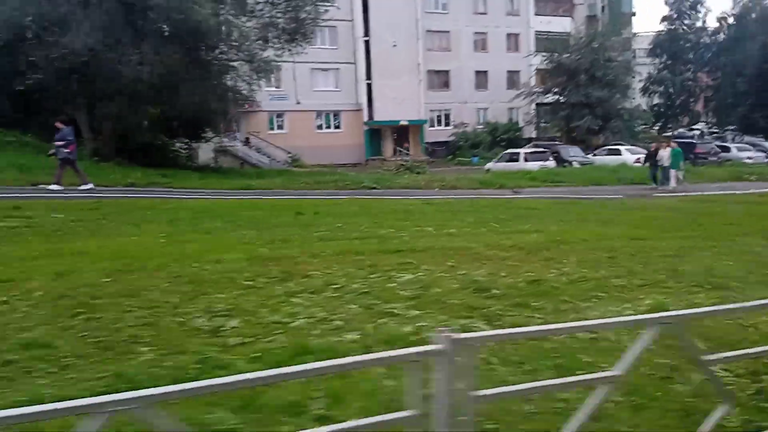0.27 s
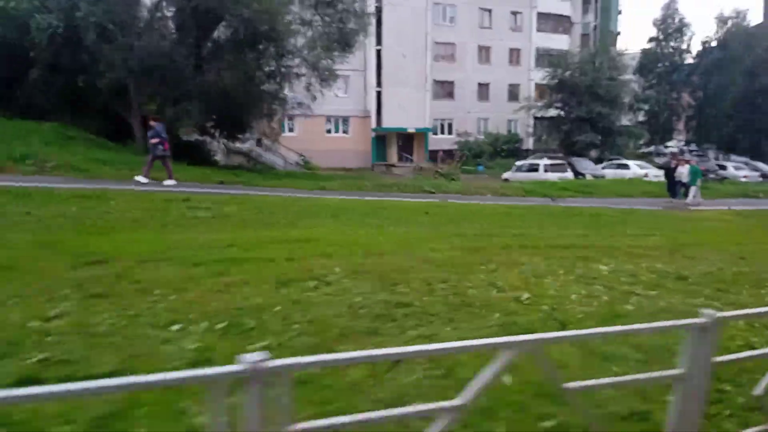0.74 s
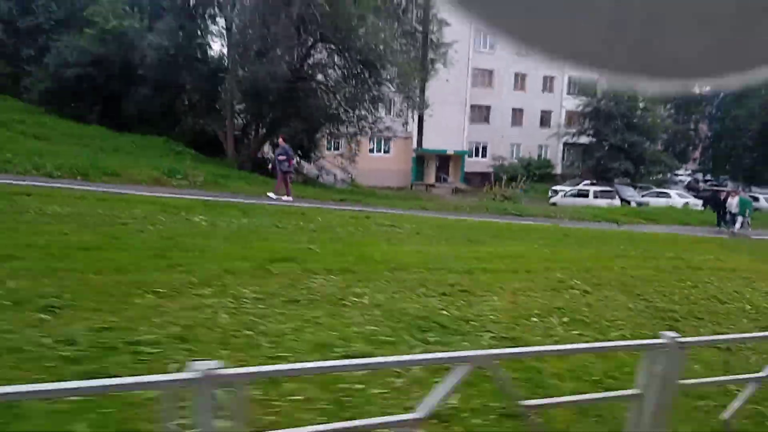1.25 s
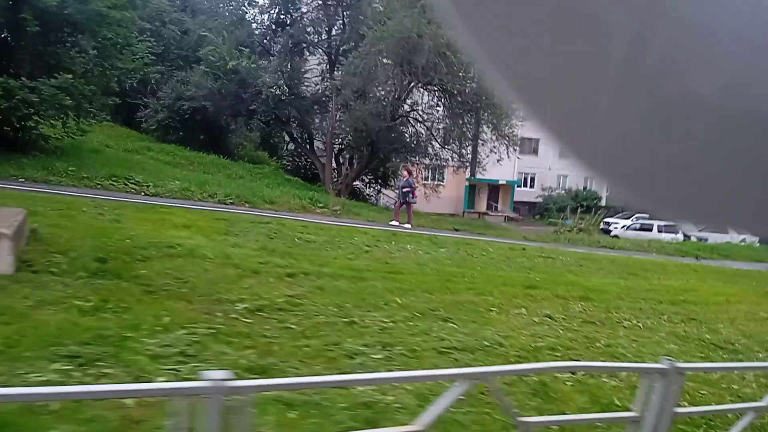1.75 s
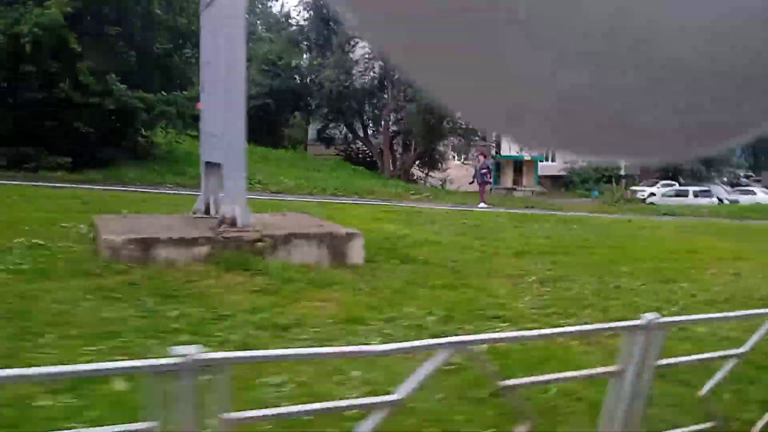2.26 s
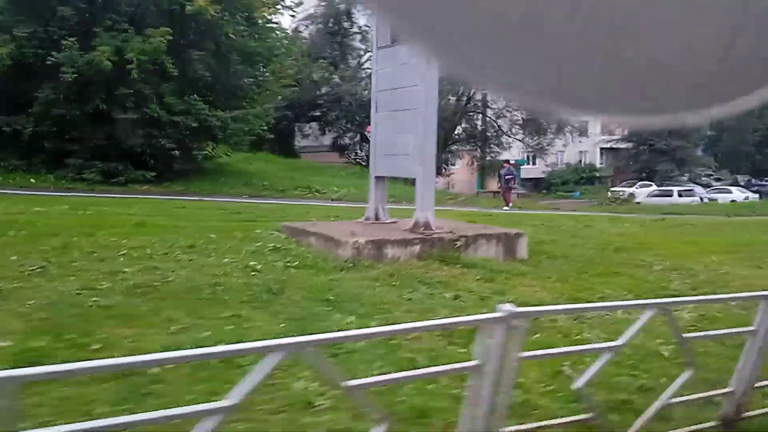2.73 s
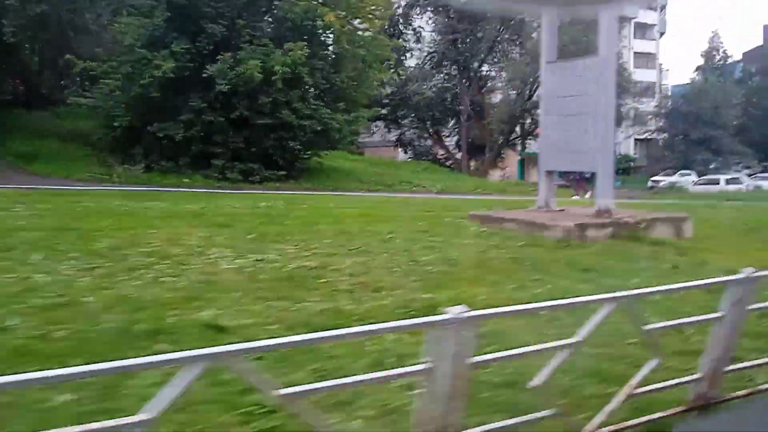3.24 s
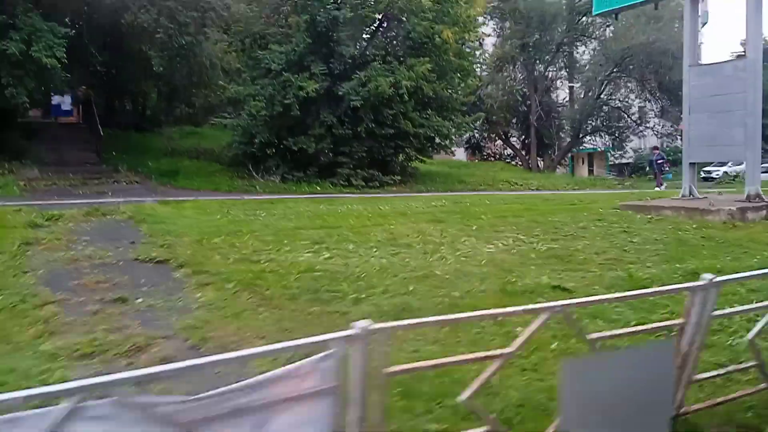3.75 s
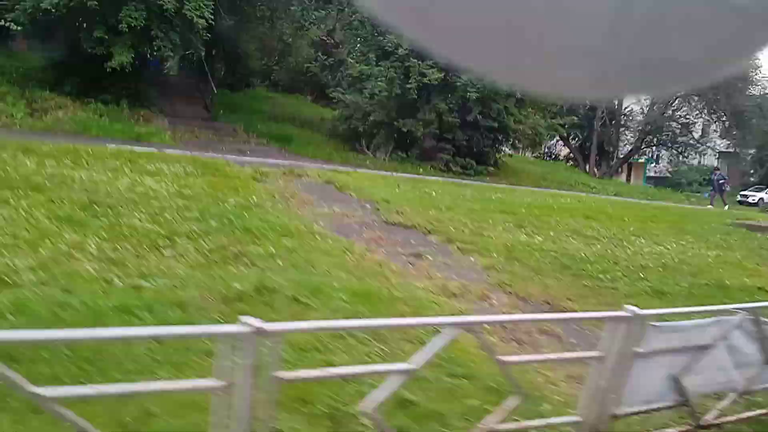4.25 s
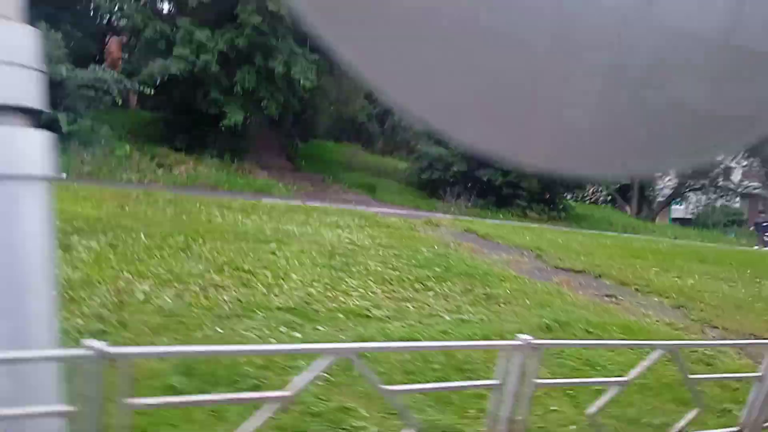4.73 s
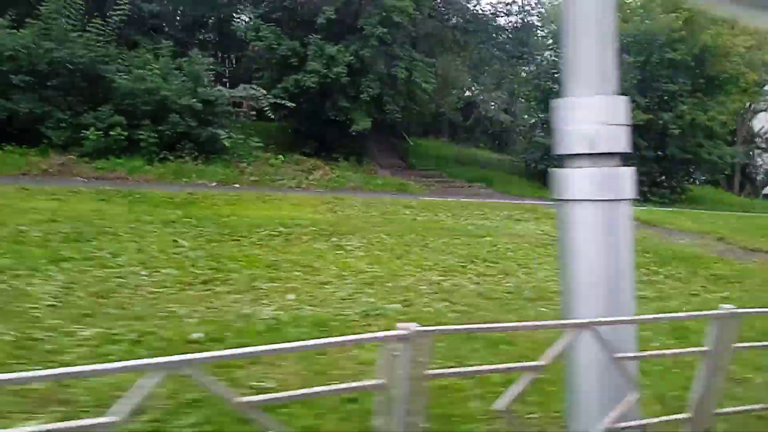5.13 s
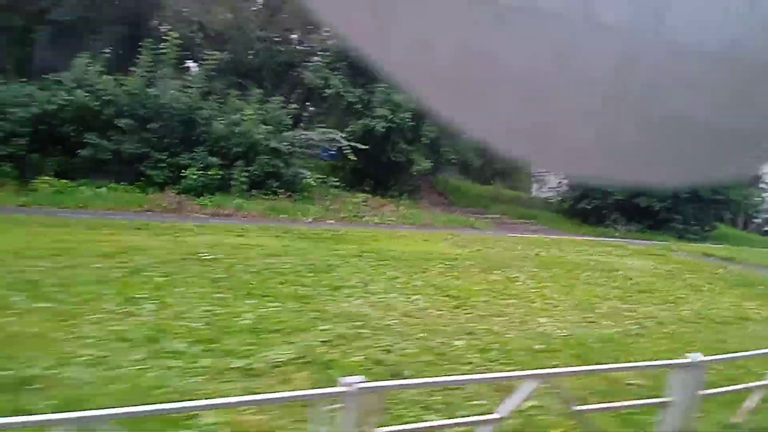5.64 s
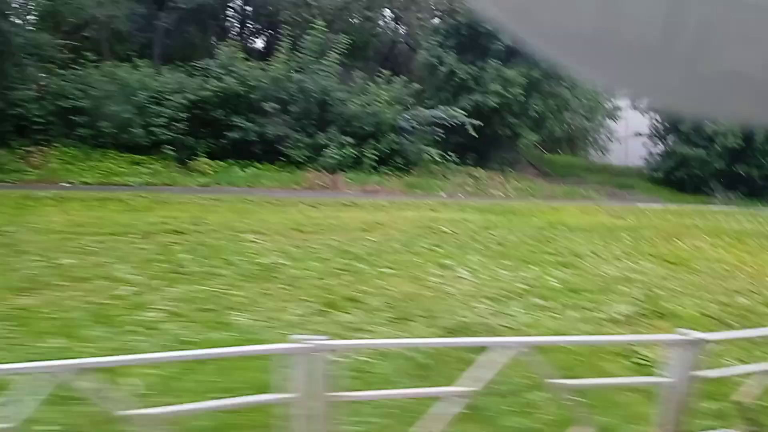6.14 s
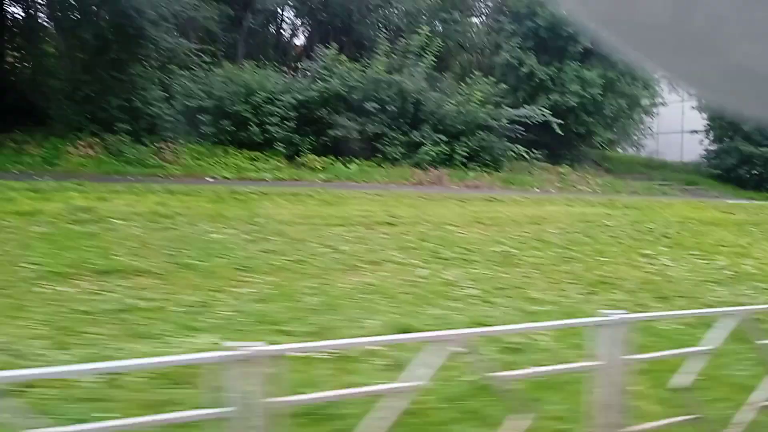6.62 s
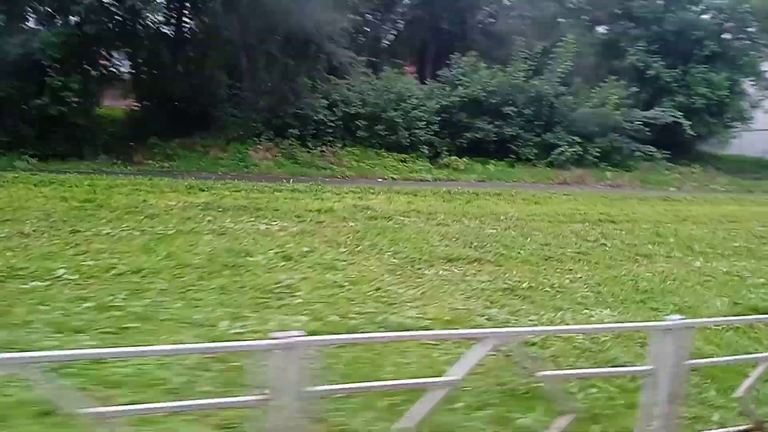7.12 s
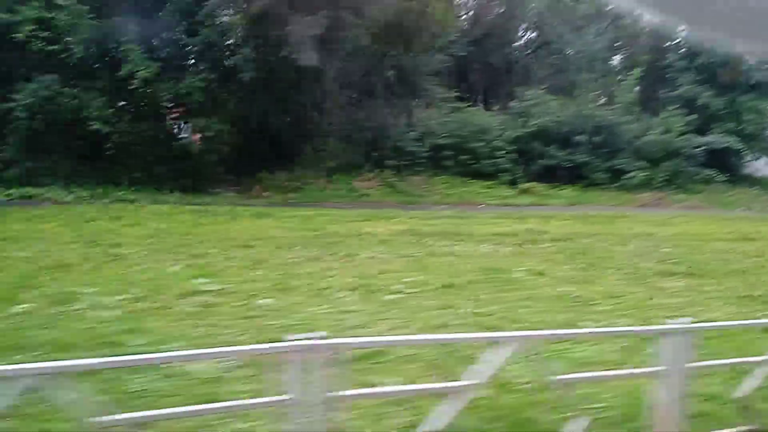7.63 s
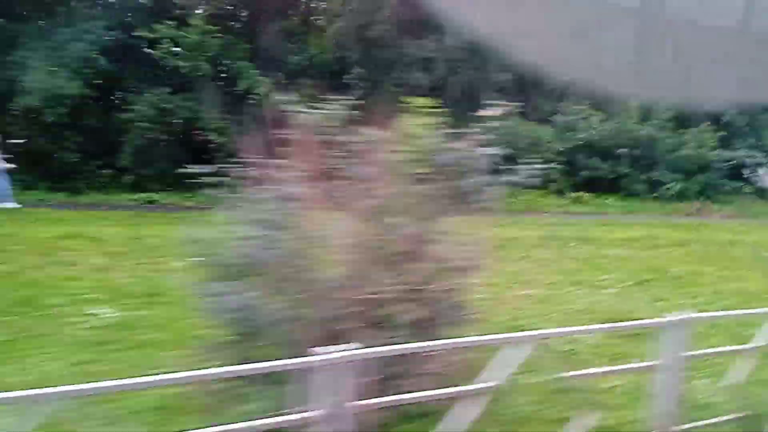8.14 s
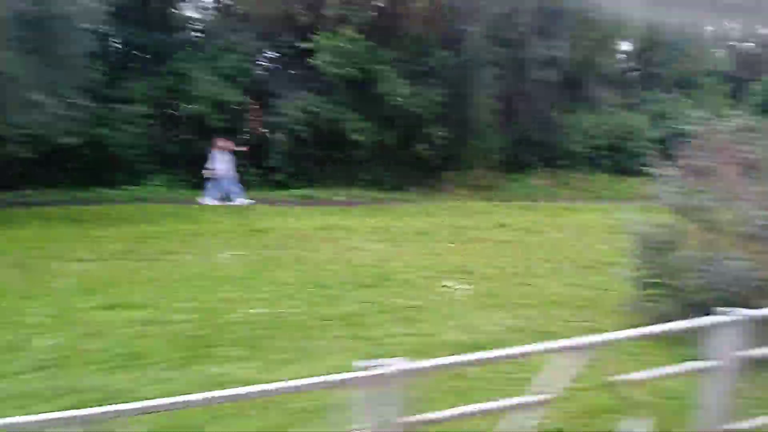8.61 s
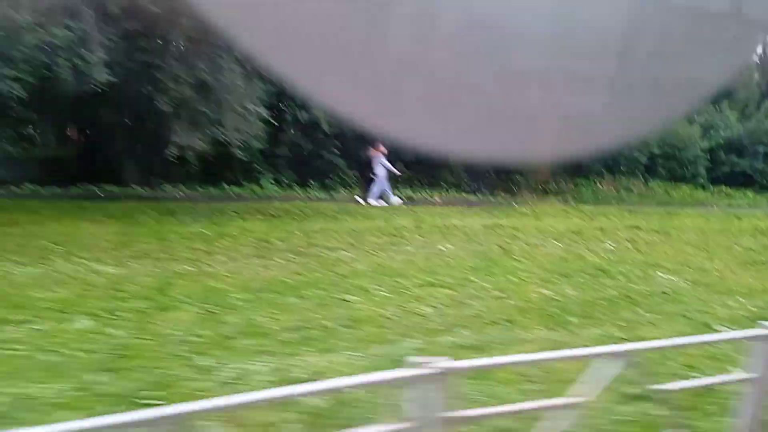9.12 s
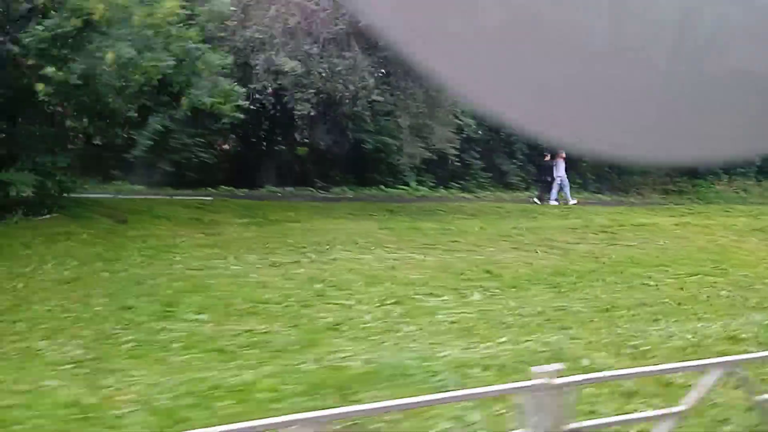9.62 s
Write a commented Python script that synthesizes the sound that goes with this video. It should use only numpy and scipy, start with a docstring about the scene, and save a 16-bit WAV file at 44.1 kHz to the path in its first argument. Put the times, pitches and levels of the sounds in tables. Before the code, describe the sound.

The sound is heard inside a moving minibus through a phone microphone, with low tyre rumble and a droning body throughout its ten seconds. At first the engine pulls hard, with a throbbing boom, clatter and slightly rising gear whine. From about 1.5 seconds it eases off and sinks in pitch for a gear change. A dry joint gives a high, stuttering squeak at 1.5 seconds, the body shudders dully near 1.8, and a softer squeak follows around 2.5. Faint ticks come near 3 seconds, while the engine is quietest. At 3.5 seconds the next gear takes hold, and the hum and a juddering whine climb slowly until the end. Loose trim rattles with dry ticks, hollow clacks and slight metallic ringing around 4.7 to 5 seconds and again from 5.2 to 5.5. The tyres rumble briefly over rough patches near 6.6 and 7.5 seconds.

```python
"""Minibus changing gear

Inside the cabin on a city road, heard through a phone's microphone. The engine pulls with a throbbing
boom, drops for a gear change, then climbs again. Its firings roar and clatter, the gears whine and the
tyres rumble through the ringing body. A dry joint squeaks twice in the shift; loose trim rattles after."""
import sys
import numpy as np
from scipy import signal
from scipy.fft import rfft, irfft
from scipy.io import wavfile

SR = 44100
rng = np.random.default_rng(int(sys.argv[2]) if len(sys.argv) > 2 else 0)


def store_wav(level_fs):
    """Save 16-bit WAV to argv[1]."""
    pcm = np.round(np.clip(np.atleast_2d(level_fs), -1, 1) * 32767)
    wavfile.write(sys.argv[1], SR, pcm.T.astype(np.int16))


N = 435266
TIME = np.arange(N) / SR
FREQ = np.maximum(np.arange(N // 2 + 1) * SR / N, 1)
THROTTLE_OFF_S, OVERRUN_END_S, CLUTCH_IN_S = 1.34, 2.42, 3.49


def undb(db):
    """Decibels to gain."""
    return 10 ** (np.asarray(db) / 20)


def unit(x):
    """Scale to rms 1."""
    return x / np.std(x)


def noise():
    """White noise."""
    return rng.standard_normal(N)


def walk(rate):
    """A smooth random curve with spread 1, changing about `rate` times a second."""
    return unit(irfft(rfft(noise()) / (1 + (FREQ / rate) ** 4), N))


def during(start, end, fade_s):
    """1 from start to end, fading outside."""
    return np.clip(1 + np.minimum(TIME - start, end - TIME) / fade_s, 0, 1)


def swell(start, length):
    """A rounded rise and fall."""
    return np.sqrt(np.abs(np.sin(np.pi * np.clip((TIME - start) / length, 0, 1))))


def spells(table):
    """One swell for each row of start in seconds, length in seconds, level in dB."""
    return sum(undb(db) * swell(start, length) for start, length, db in table)


def colour(x, spectrum):
    """Shape by (Hz, dB) points, falling away past the ends, and scale to rms 1."""
    hz, db = np.transpose(spectrum)
    ends = np.minimum(FREQ / hz[0], 1) * np.minimum(hz[-1] / FREQ, 1)
    gain = undb(np.interp(np.log(FREQ), np.log(hz), db)) * ends ** 2
    return unit(irfft(rfft(x) * gain, N))


def band(x, hz, kind):
    """Butterworth filter."""
    return signal.sosfilt(signal.butter(4, hz, kind, fs=SR, output="sos"), x)


def resonance(hz, centre, width):
    """Gain of a resonance, 1 at its centre."""
    return 1 / (1 + (2 * (hz - centre) / width) ** 2)


def ring(drive, hz, width_hz):
    """A resonance shaken by the drive, at rms 1."""
    return unit(irfft(rfft(drive) * resonance(FREQ, hz, width_hz), N))


def struck(blows, modes):
    """Each blow sets the modes ringing."""
    t = TIME[:SR // 4]
    tone = sum(undb(db) * np.sin(2 * np.pi * hz * t) * 1000 ** (-t / t60) for hz, t60, db in modes)
    return signal.fftconvolve(blows, tone)[:N]


def partial(turns, db, waver_db, slack_rad):
    """One tone whose strength and phase waver at random."""
    level = np.sqrt(2) * undb(db + waver_db * walk(5))
    return level * np.sin(2 * np.pi * turns + slack_rad * walk(14))


def lifted_db(hz):
    """Level of an engine tone as its pitch sweeps through the cabin resonances."""
    # Cabin resonances. Each row: centre in Hz, width in Hz, level in dB.
    cabin_modes = [(94.2, 8.6, -42), (107, 5.5, -36.5), (163.9, 17.3, -22.5), (176.4, 9, -31.5),
                   (217.6, 22, -36.5), (245, 7.4, -38.5), (344.5, 17, -38.5), (357.2, 13, -35.5),
                   (373.3, 24, -40), (388.3, 9.2, -41), (401.7, 7.2, -41.5), (414, 32, -45.5),
                   (431, 8, -46), (446, 5.1, -34.5), (452.3, 10.3, -39.5), (461, 6.8, -42.5)]
    gains = [undb(db) * resonance(hz, centre, width) for centre, width, db in cabin_modes]
    return 20 * np.log10(np.linalg.norm(gains, axis=0))


def lower_gear(rate, cycles, throb_hz=6.5, throb_depth=.19, mesh_db=-55):
    """Twice the firing rate booms in the cabin and beats with a slower shaft; the gears whine above."""
    # Speeds at which the gear sings. Each row: cycle rate in Hz, width in Hz, level in dB.
    singing = [(20.22, .22, -40.5), (21.85, .8, -36)]
    # Gear mesh tones. Each row: multiple of the cycle rate, dB against the whine.
    mesh = [(20.8, -6), (24.1, -6), (27.1, -11), (34, -4), (68, -13), (148, -26.5)]
    # Weaker engine tones. Each row: multiple of the cycle rate, level in dB.
    pull_lines = [(4, -44.5), (6, -45.5), (7, -44), (10, -54), (11, -51.5), (13, -49.5), (24.2, -57)]
    boom_db = lifted_db(8 * rate)
    boom = partial(8 * cycles, boom_db, waver_db=.57, slack_rad=.048)
    shaft = partial(8 * cycles - throb_hz * TIME, boom_db, .81, .08)
    sing = undb(mesh_db) + sum(undb(db) * resonance(rate, hz, width) for hz, width, db in singing)
    whine = sing * sum(partial(k * cycles, db, 1.2, .16) for k, db in mesh)
    weak_tones = sum(partial(k * cycles, db, 2.1, .25) for k, db in pull_lines)
    return (boom - throb_depth * shaft + whine + weak_tones) * during(0, THROTTLE_OFF_S, fade_s=.35)


def firings(cycles, depth=.55, decay_periods=.45, scatter_db=5):
    """Noise flares at the four firings of each cycle; cylinders differ and no two firings are alike."""
    # Relative strength of each cylinder in dB.
    cylinders_db = [-1.5, -3, 0.5, -4.5]
    firing, phase = np.divmod(4 * cycles, 1)
    firing = firing.astype(int)
    db = np.take(cylinders_db, firing % 4) + scatter_db * rng.uniform(-1, 1, N // 100)[firing]
    flare = depth * undb(db) * np.exp(-phase / decay_periods)
    return unit(noise() * (1 + flare))


def combustion(cycles, effort_db):
    """Firings drive a low roar and a clatter whose registers waver apart; the block rings in fits."""
    # Roar spectrum. Each row: frequency in Hz, relative level in dB.
    roar_spectrum = [(250, -4), (380, -3.5), (480, 3), (600, 2.5), (720, -2), (850, -9.5), (1300, -24.5)]
    # Engine clatter, plus in the top two rows a faint, very high recording hiss that follows its level.
    # Each row: frequency in Hz, relative level in dB.
    clatter_and_hiss_spectrum = [(600, -5.5), (950, 3), (1400, -3.5), (1650, -4), (2100, -4.5), (2900, -12),
                                 (3700, -18.5), (6000, -20.5), (7300, -22.5), (8500, -35.5), (13700, -44),
                                 (14700, -33.5), (16500, -31.5)]
    # Registers of the clatter. Each row: low edge in Hz, high edge in Hz.
    clatter_bands = [(300, 1100), (1100, 1900), (1900, 3400)]
    # Resonances of the block and covers. Each row: centre in Hz, width in Hz, dB against the clatter.
    block_modes = [(1375, 130, -13.5), (1825, 70, -18), (2010, 51, -16), (2230, 51, -19.5),
                   (2594, 57, -22.5), (2838, 58, -25.5)]
    roar_db, clatter_db = -37.5 + .61 * effort_db, -41.5 + effort_db
    roar = colour(firings(cycles), roar_spectrum) * undb(roar_db + 2 * walk(17.4))
    registers = sum(band(firings(cycles), edges, "bandpass") * undb(1.78 * walk(15))
                    for edges in clatter_bands)
    treble = band(noise(), clatter_bands[-1][1], "highpass")
    clatter_and_hiss = colour(registers + treble, clatter_and_hiss_spectrum)
    block = sum(ring(firings(cycles), hz, width) * undb(db + 2.8 * walk(15))
                for hz, width, db in block_modes)
    return roar + (clatter_and_hiss + block) * undb(clatter_db)


def tyres(start_db=-45, rise_db_per_s=.38):
    """Tyres rumble through the floor, louder as the bus gathers speed and on rough patches."""
    # Rough patches of road. Each row: start in seconds, length in seconds, level in dB.
    bumps = [(1.45, 0.75, -45), (4.6, 0.44, -46), (6.6, 0.3, -36), (7.47, 0.29, -38.5)]
    # Rumble spectrum. Each row: frequency in Hz, relative level in dB.
    road_spectrum = [(20, -33), (40, -22.5), (60, -14.5), (78, -4), (105, -7), (145, -12.5), (300, -18.5)]
    level = undb(start_db + rise_db_per_s * TIME + .57 * walk(8.1)) + spells(bumps)
    return colour(noise(), road_spectrum) * level


def body(effort_db):
    """The body drones with the engine's effort, up to a ceiling, and its panels ring in fits."""
    # Drone spectrum. Each row: frequency in Hz, relative level in dB.
    body_spectrum = [(80, -14.5), (115, -7.5), (160, 5), (200, 0.5), (260, -0.5), (320, -7.5), (390, -7.5),
                     (700, -27)]
    # Body panels. Each row: centre in Hz, width in Hz, average level in dB.
    panel_modes = [(451, 12, -56), (702.6, 30, -54), (895, 11, -64)]
    drone_db = -31 + .6 * np.minimum(effort_db, -1)
    drone = colour(noise(), body_spectrum) * undb(drone_db + 1.2 * walk(5.9))
    shake_db = drone_db - np.mean(drone_db)
    panels = sum(ring(noise(), hz, width) * undb(db + shake_db + walk(1.7) + 2.2 * walk(9.9))
                 for hz, width, db in panel_modes)
    return drone + panels


def whistle(rest_db=-61):
    """A faint, narrow ring that swells now and then."""
    # Swells of the whistle. Each row: start in seconds, length in seconds, level in dB.
    whistles = [(1.7, 0.72, -59), (4.4, 1.5, -63.5), (7.3, 0.46, -57)]
    return ring(noise(), hz=1240, width_hz=27) * (undb(rest_db) + spells(whistles))


def overrun(rate, cycles):
    """A ragged hum that sinks as the engine slows."""
    hum = partial(11 * cycles, lifted_db(11 * rate), waver_db=4, slack_rad=.85)
    return hum * during(THROTTLE_OFF_S, OVERRUN_END_S, fade_s=.066)


def squeaks(stutter_db=2, scrape_db=-11, free_jitter=.0018, caught_jitter=.003):
    """A dry joint sings on its even harmonics, then catches, adding the odd ones and a scrape."""
    # Slips of the joint. Each row: start in seconds, length in seconds, pitch in Hz, glide as a share
    # of the pitch, level in dB, lift of the odd harmonics in dB, lift of the octave in dB.
    slips = [(1.512, .105, 2063, .008, -53.5, -24, -4), (1.59, .036, 2089, .002, -43, -24, 1),
             (1.607, .028, 2090, .002, -41.5, 4, 2), (1.624, .026, 2092, 0, -42.5, -2, -4),
             (1.648, .018, 2050, -.02, -48, 2, -3), (1.665, .02, 2025, -.005, -54, 15, 0),
             (2.48, .085, 2054, -.004, -55, -30, 1), (2.55, .14, 2042, -.002, -52, -30, 1),
             (2.683, .024, 2065, 0, -53.5, 3.5, 2), (2.714, .03, 2068, .003, -48, 1.5, -5)]
    # Base levels of harmonics 1 to 7 in dB.
    harmonics_db = [2, 0, 3.5, -8.5, -20, -25, -28]
    out, tremble = np.zeros(N), walk(270)
    grips = [undb(stutter_db * walk(64)) for _ in harmonics_db]
    scrape = undb(scrape_db) * ring(noise(), hz=6150, width_hz=650)
    for start, length, hz, glide, db, odd_db, octave_db in slips:
        on = (TIME > start) & (TIME < start + length)
        jitter = free_jitter + caught_jitter * min(undb(odd_db), 1)
        slide = 1 + glide * ((TIME[on] - start) / length - .5)
        turns = np.cumsum(hz * slide * (1 + jitter * tremble[on])) / SR
        bite_db = .22 * (db + 46)  # louder slips are brighter above the fourth harmonic
        tone = 0
        for k, (base_db, grip) in enumerate(zip(harmonics_db, grips), 1):
            lift_db = odd_db * (k % 2) + octave_db * (k == 2) + bite_db * max(k - 4, 0)
            tone += undb(base_db + lift_db) * grip[on] * np.sin(2 * np.pi * k * turns)
        out[on] += undb(db) * swell(start, length)[on] ** 2 * (tone + undb(odd_db) * scrape[on])
    return out


def cabin(x, t60=.21, wet_db=-8):
    """Dense short reflections from windows and roof follow the direct sound to the microphone."""
    t = TIME[:SR // 2]
    tail = rng.standard_normal(len(t)) * 1000 ** (-t / t60) * (t > .003)
    return x + undb(wet_db) * signal.fftconvolve(x, tail / np.linalg.norm(tail))[:N]


def jolts(hz=327, width_hz=100):
    """The body shudders dully as the drive goes slack."""
    # Shudders. Each row: start in seconds, length in seconds, level in dB.
    shudders = [(1.755, 0.064, -34), (1.86, 0.1, -43)]
    return ring(ring(noise(), hz, width_hz), hz, width_hz) * spells(shudders)


def rattles(ring_db=-7, rise_s=.0007, patter_per_s=110, patter_decay_s=.003):
    """Loose trim knocks with a dry tick and a hollow clack, ringing itself and its metal bracket."""
    # Knocks. Each row: start in seconds, tick in dB, clack in dB, metal ring in dB, decay in seconds.
    knocks = [(2.862, -65, -75, -68, .03), (3.028, -61, -70, -66, .008), (3.114, -62, -72, -65, .01),
              (4.686, -64, -55, -75, .005), (4.753, -49, -40.5, -55, .007), (4.761, -48, -46, -47, .011),
              (4.809, -59, -64, -59, .012), (4.91, -57, -66, -68, .003), (4.965, -58, -64, -68, .006),
              (5.231, -57, -62, -72, .004), (5.307, -54, -50, -49, .006), (5.336, -61, -47.5, -62, .017),
              (5.388, -53, -51, -59, .003), (5.3928, -54, -37.5, -62, .0035), (5.45, -59, -51, -70, .003)]
    # Spells of faint patter. Each row: start in seconds, length in seconds, level in dB.
    buzzes = [(2.83, .39, -66.5), (4.65, .39, -63), (5.27, .3, -65)]
    # Spectra of the tick and the clack. Each row: frequency in Hz, relative level in dB.
    tick_spectrum = [(3000, 9), (5000, -9), (7400, 4), (8400, -15), (11000, -12), (13000, -23),
                     (15000, -18)]
    clack_spectrum = [(900, 3), (1300, 9), (2000, 10), (2900, -4), (3600, -3), (4300, -9), (5200, -11),
                      (5900, 2), (7000, -22)]
    # Modes of trim and bracket. Each row: frequency in Hz, seconds to fall 60 dB, relative level in dB.
    trim_modes = [(1260, .034, -3), (1860, .03, -2), (2480, .025, -3), (3400, .04, 1), (3850, .02, 2),
                  (4900, .05, -8)]
    metal_modes = [(4075, .05, -10), (5950, .05, -3), (6090, .035, -3), (7305, .09, -9), (10610, .06, -22)]
    chatter = undb(2.5 * walk(200))
    taps = (rng.random(N) < patter_per_s / SR) * undb(3.5 * noise())
    patter = signal.lfilter([1], [1, -np.exp(-1 / (patter_decay_s * SR))], taps)
    tick = spells(buzzes) * patter
    clack, on_trim, on_metal = np.zeros((3, N))
    for start, tick_db, clack_db, metal_db, decay in knocks:
        blow = np.clip((TIME - start) / rise_s, 0, 1) * np.exp(-np.abs(TIME - start) / decay)
        tick += undb(tick_db) * blow
        clack += undb(clack_db) * blow
        push = blow / np.linalg.norm(blow)
        on_trim += undb(clack_db + ring_db) * push
        on_metal += undb(metal_db) * push
    rings = struck(on_trim * noise(), trim_modes) + struck(on_metal * noise(), metal_modes)
    contacts = tick * colour(noise(), tick_spectrum) + clack * colour(noise(), clack_spectrum)
    return chatter * contacts + rings


def chirps(jitter=.0093):
    """Cabin fixtures give thin chirps with a trembling pitch."""
    # Chirps. Each row: start in seconds, length in seconds, pitch in Hz, level in dB.
    calls = [(3.161, .014, 5600, -60), (4.068, .052, 11100, -68), (4.69, .034, 11350, -71)]
    unsteady_time = np.cumsum(1 + jitter * walk(270)) / SR
    return sum(undb(db) * swell(start, length) * np.sin(2 * np.pi * hz * unsteady_time)
               for start, length, hz, db in calls)


def higher_gear(rate, cycles, lash=.22, build_s=1.1, settle_s=1.8):
    """Firing hum, uneven cylinders and two gear whines climb; the whines judder till the drive settles."""
    # Surges of the whine. Each row: start in seconds, length in seconds, relative level in dB.
    surges = [(3.53, .13, -1), (3.9, .18, 3), (4.2, .2, 0), (5.3, .27, -2), (6.52, .33, -7),
              (6.92, .75, -11), (8.25, .7, -10), (9.42, .45, -7)]
    # Weaker engine tones. Each row: multiple of the cycle rate, level in dB once built up.
    climb_lines = [(3.2, -53.5), (5, -44), (6.1, -48), (7, -46), (8, -50.5), (10, -59), (10.7, -51.5),
                   (11.4, -58), (28, -59.5), (34, -57.5)]
    hum = partial(4 * cycles, lifted_db(4 * rate), waver_db=2.7, slack_rad=.38)
    judder = np.exp(-np.abs(TIME - CLUTCH_IN_S) / settle_s)
    whine = sum(partial(k * cycles, lifted_db(k * rate), 1.2 + 1.5 * judder, .3 + .4 * judder)
                for k in (14.08, 17))
    whine *= undb(-2.5) + spells(surges)
    weak_tones = sum(partial(k * cycles, db, 2.06, .77) for k, db in climb_lines)
    whine *= 1 + lash * walk(27)  # rough with play in the teeth
    build = np.interp(TIME, [CLUTCH_IN_S, CLUTCH_IN_S + build_s], [.45, 1])
    return (hum + (whine + weak_tones) * build) * during(CLUTCH_IN_S, TIME[-1], fade_s=.039)


def scene():
    """Engine speed sets the engine and gear pitches; effort sets the roar, clatter and body drone."""
    # Engine speed: pull, drop, slower climb. Each row: time in seconds, cycle rate in Hz.
    speed = [(0, 20.1), (1.3, 22.4), (1.55, 22.65), (1.75, 21.9), (2.3, 17.7), (2.9, 17), (3.5, 20.9),
             (4, 22.2), (7, 24.8), (9, 26.75), (9.87, 27.45)]
    # How hard the engine works. Each row: time in seconds, dB against full throttle.
    effort = [(0, 0), (1.6, 0.5), (2.1, -5), (3.25, -12), (3.55, -8), (7, -7.5), (9.87, -5.5)]
    rate = np.interp(TIME, *np.transpose(speed))
    effort_db = np.interp(TIME, *np.transpose(effort))
    cycles = np.cumsum(rate) / SR
    tones = lower_gear(rate, cycles) + overrun(rate, cycles) + higher_gear(rate, cycles)
    engine = tones + combustion(cycles, effort_db)
    ride = tyres() + body(effort_db) + jolts() + whistle()
    fixtures = cabin(squeaks() + rattles() + chirps())
    return (engine + ride + fixtures)[None]


def record(dry, top_hz=15750):
    """The phone in the cabin cuts the highest treble."""
    return signal.sosfilt(signal.ellip(10, .2, 80, top_hz, fs=SR, output="sos"), dry)


dry = scene()
out = record(dry)
store_wav(out)
```